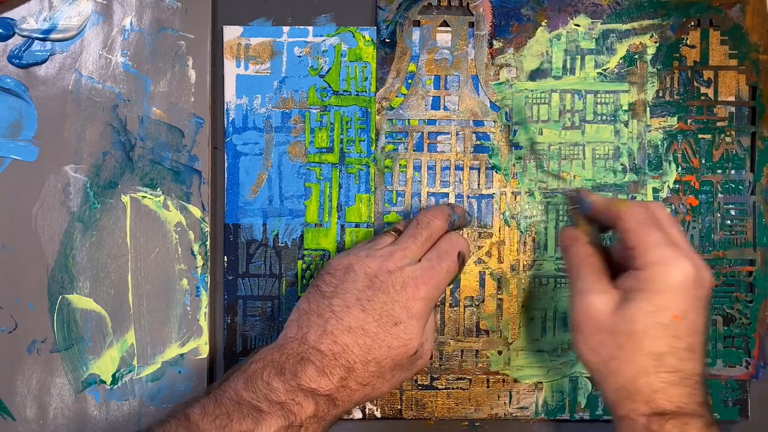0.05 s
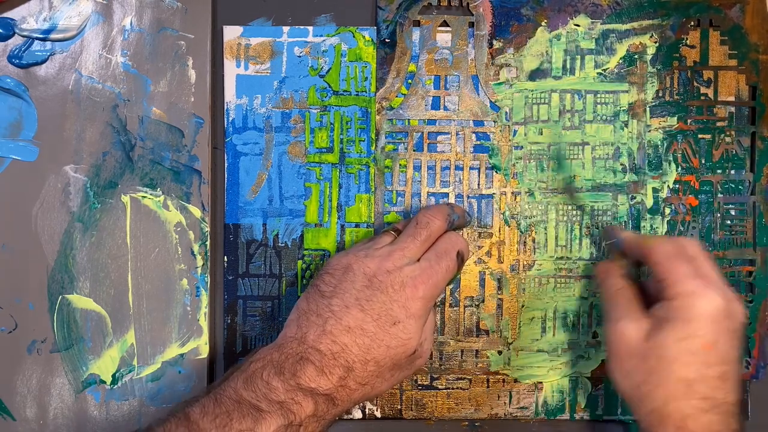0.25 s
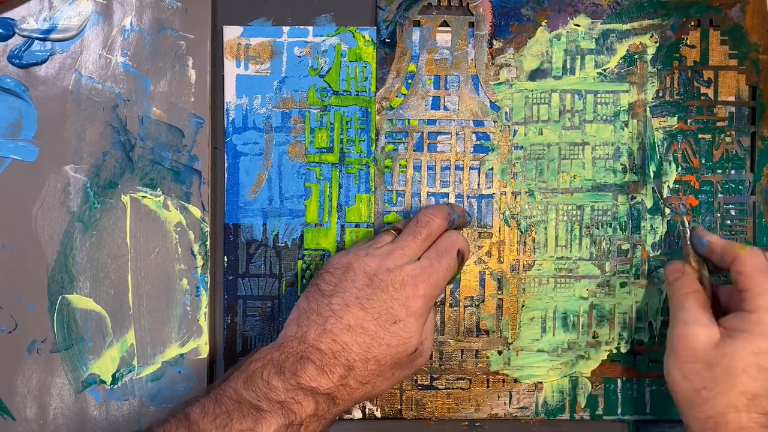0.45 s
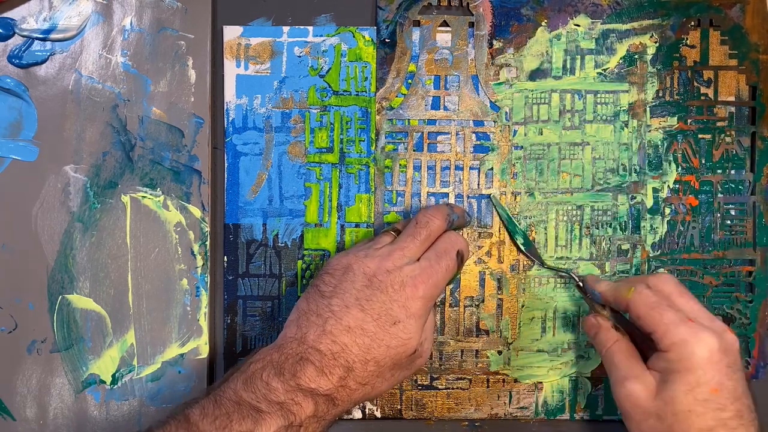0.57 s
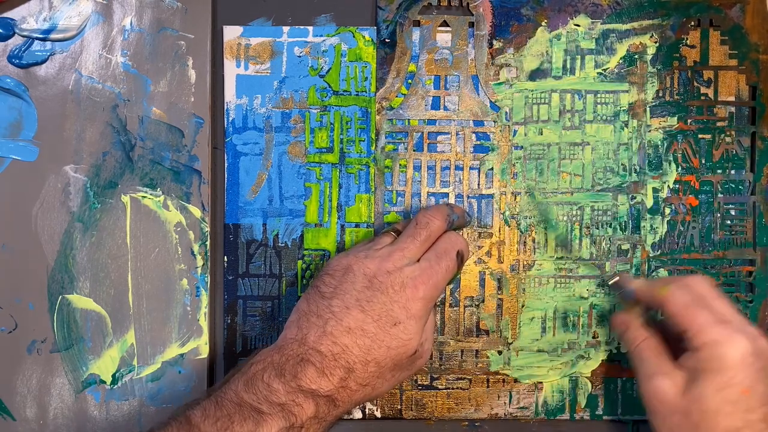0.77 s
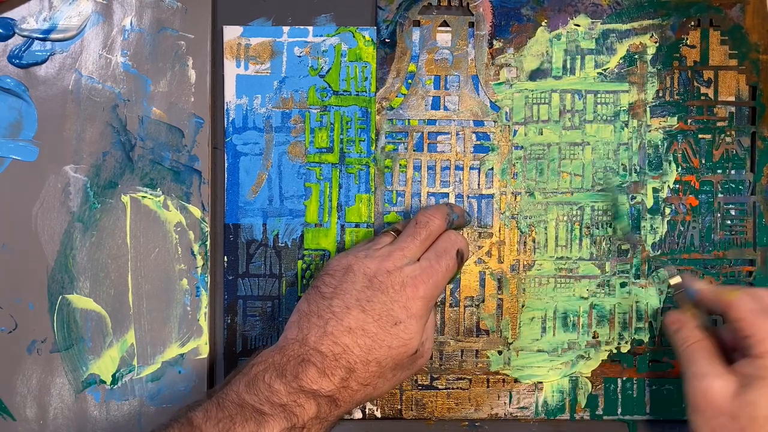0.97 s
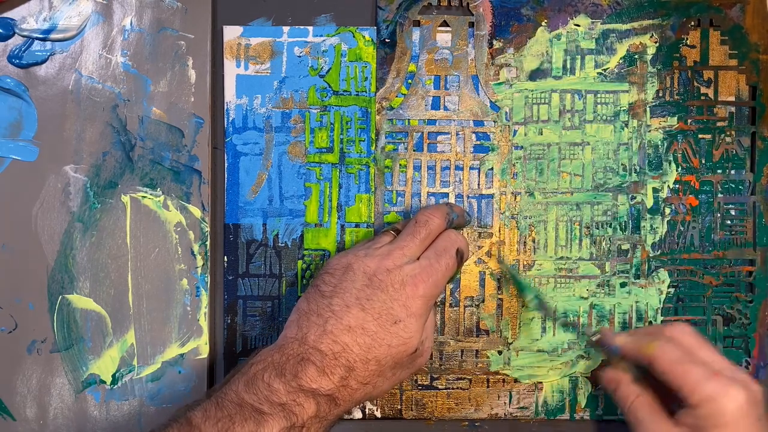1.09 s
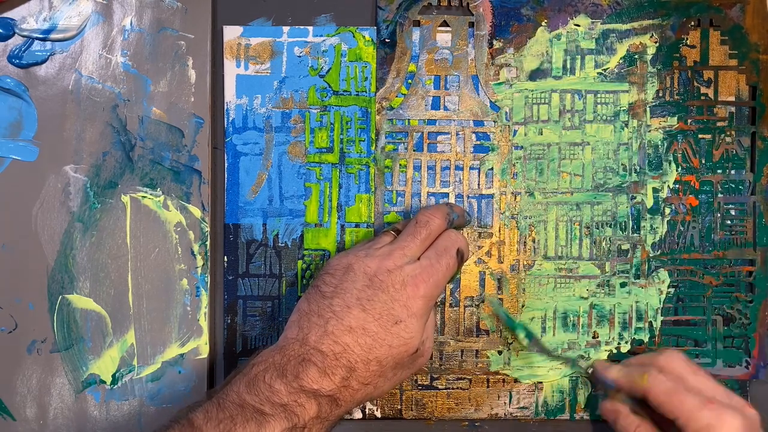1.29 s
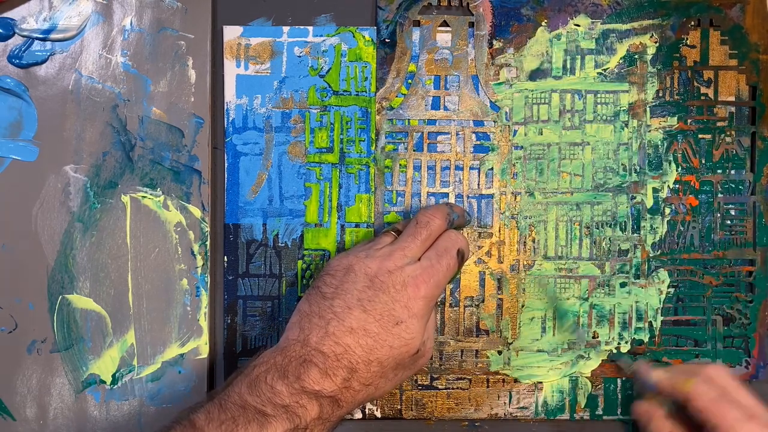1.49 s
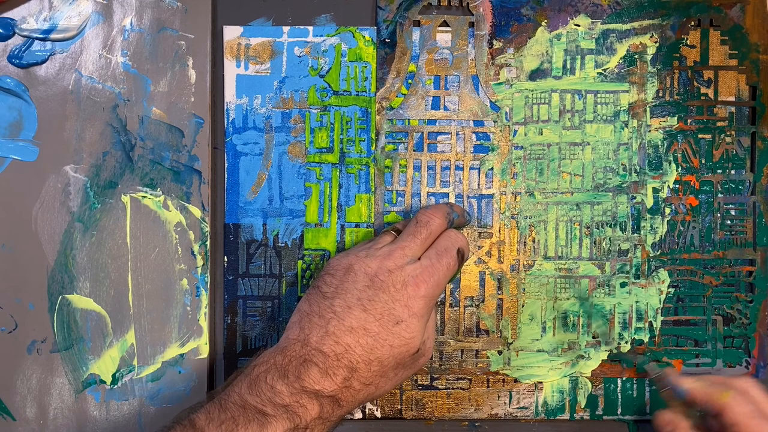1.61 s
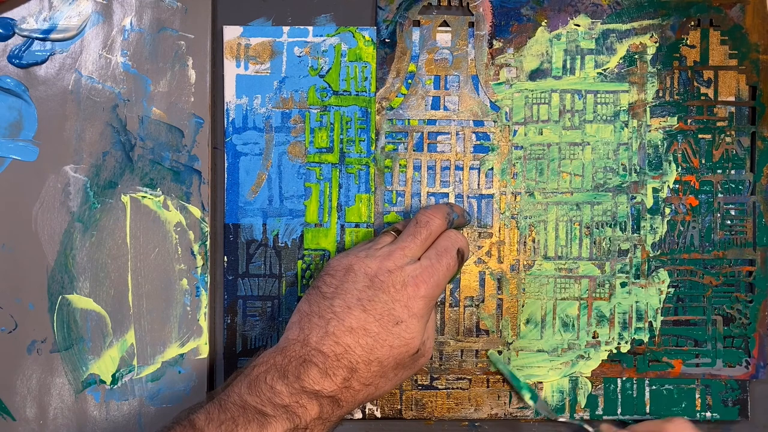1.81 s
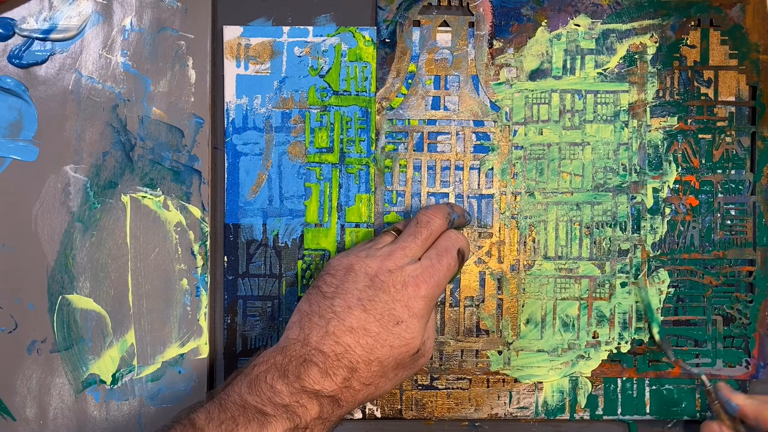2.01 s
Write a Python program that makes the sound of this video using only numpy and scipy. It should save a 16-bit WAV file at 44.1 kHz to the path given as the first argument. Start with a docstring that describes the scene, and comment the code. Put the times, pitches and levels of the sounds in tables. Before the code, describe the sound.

A thin steel palette knife scrapes a paint-gritty plastic stencil in seven short, evenly spaced strokes, each starting with a small tick; close single microphone, small quiet room, soft low buffeting between later strokes.

```python
"""Palette knife over a stencil

A thin steel palette knife is dragged in quick strokes over a plastic stencil on a board, close to one microphone.
The blade lands with a tick (decaying sines and a noise crack), then stutters over cut edges and paint grit
(random grains through blade and board spectra); snags ring briefly and the bent blade rasps in narrow noise bands.
A small room answers with decaying noise tails, over faint room tone and rumble.
Low buffeting, a swelling low noise, comes with the arm's return swings.
"""
import sys
import numpy as np
from scipy import signal
from scipy.fft import rfft, irfft, next_fast_len
from scipy.io import wavfile
from scipy.ndimage import uniform_filter1d, map_coordinates

SR = 44100
rng = np.random.default_rng(int(sys.argv[2]) if len(sys.argv) > 2 else 0)


def amplitude_ratio(level_db):
    """Convert a level in decibels to the matching linear amplitude (field) ratio."""
    exponent = np.asarray(level_db, float) / 20
    return 10 ** exponent


def inscribe(sig):
    """Save sig as 16-bit PCM at rate SR to the path in sys.argv[1].

    A 1-D sig is mono; a 2-D sig holds one channel per row.
    Samples are clipped to [-1, 1] before scaling.
    """
    pcm = np.round(np.clip(np.atleast_2d(sig).T, -1, 1) * 32767)
    wavfile.write(sys.argv[1], SR, pcm.astype(np.int16))


N = 90404  # samples

# Scrape, one table a stroke: t/s, level/dB, board thrum over it level/dB, blade-middle over it level/dB
STROKES = [
    [(0.2, -68.5, 6, 6), (0.224, -42.5, -4.5, 3.5), (0.262, -26.5, -6.5, -9.5), (0.286, -30, -14.5, -6),
     (0.31, -43, -1, 6.5), (0.324, -35, -13.5, -4.5), (0.35, -61, 9, 7)],
    [(0.483, -64, 16, 16), (0.491, -52, 5, 8), (0.501, -38, -0.5, -0.5), (0.513, -27, -8, -0.5),
     (0.547, -25, -10, -8.5), (0.571, -42.5, 1.5, 5), (0.59, -58, 10, 0)],
    [(0.728, -38.5, -9, -13), (0.74, -44.5, 0.5, 2), (0.748, -28, -8, -1), (0.758, -26, -8.5, -5.5),
     (0.79, -28, -12.5, -6), (0.796, -32, 4.5, 1.5), (0.81, -31, -3.5, 1.5), (0.85, -64, 4, 5)],
    [(0.98, -39, -9, 1.5), (0.998, -25.5, -15.5, -4), (1.044, -27, -8.5, -10), (1.062, -38, -6.5, 5.5),
     (1.09, -73, -12, 3)],
    [(1.205, -39, -2, 5), (1.211, -50.5, 5.5, 10), (1.231, -28, -12, -3), (1.257, -24.5, -14, -13.5),
     (1.269, -28.5, -7, -6.5), (1.287, -26.5, -12, -14), (1.295, -33, -11, -0.5), (1.33, -57.5, -9, 7.5)],
    [(1.45, -53, 7, 4), (1.462, -35.5, -8.5, -4), (1.484, -22.5, -15.5, -6), (1.513, -31, -6, -4.5),
     (1.528, -26.5, -12.5, -2), (1.554, -54, 6, 14.5), (1.57, -58, 4, 10)],
    [(1.695, -47.5, 8, 6.5), (1.713, -33, -13.5, -9.5), (1.743, -30.5, -3, -4), (1.763, -35.5, -5, 3.5),
     (1.781, -33, -11.5, 1), (1.82, -57, -8, 1)],
    [(2.006, -75, 14, 26.5), (2.016, -78, 9, 20.5), (2.03, -56, 2, -2.5), (2.05, -49.5, 7, 9.5)],
]
# Tail of an earlier stroke, same columns
FADING_STROKE = [(0, -44, -2, 1), (.03, -56, 0, 2), (.09, -70, 2, 3)]
# Colours of blade edge, blade middle and board: f/Hz, level/dB
EDGE_COLOUR = [(1650, -29.5), (2800, -3), (3320, -5.5), (3620, -4), (4260, -1.5), (4900, -6.5), (5400, 0),
               (8460, -6.5), (14100, -18.5), (15600, -23), (16300, -55)]
MIDDLE_COLOUR = [(680, -31), (1150, -23), (1300, -5), (1900, 1.5), (2050, -2), (3000, -5.5), (3900, -12),
                 (6600, -120)]
BOARD_COLOUR = [(71, -63), (120, -11.5), (318, -17.5), (360, -8.5), (524, 2), (629, -1), (763, 1),
                (1030, -2), (1110, -7), (1200, -4), (1560, -46), (2640, -120)]
# Longest board modes: f/Hz, level/dB, t60/s
BOARD_MODES = [(165, -20, .12), (285, -11, .14), (376, -2, .22), (840, -5, .12), (1312, -7, .1),
               (1478, -8, .08), (1542, -7, .09), (2350, -5, .12)]
# Room tone and building rumble colours: f/Hz, level/dB
AIR_COLOUR = [(80, -40), (130, -4), (400, -2), (900, -2), (1200, -10), (5900, -15), (15000, -24),
              (16000, -34)]
RUMBLE_COLOUR = [(15, -30), (30, -4), (55, 0), (72, -4), (85, -30), (150, -60)]
# Room decay: f/Hz, t60/s
ROOM_DECAY = [(200, 0.82), (530, 0.27), (1400, 0.29), (3000, 0.28), (6000, 0.23), (12000, .18)]
# The bent blade rasps at one pitch for a moment: middle t/s, length t/s, f/Hz, level/dB
RASPS = [(0.263, 0.049, 5500, -35), (0.549, 0.012, 5330, -39), (0.767, 0.035, 1320, -38.5),
         (1.034, 0.036, 5900, -31.5), (1.253, 0.022, 4200, -31), (1.283, 0.016, 6000, -34.5),
         (1.483, 0.0088, 3236, -20.5), (1.502, 0.0093, 5400, -29), (1.714, 0.012, 5560, -30),
         (1.721, 0.011, 6330, -32), (1.768, 0.025, 1880, -30.5), (1.788, 0.02, 1484, -37),
         (1.526, 0.011, 2000, -30.5), (1.744, .025, 2690, -35.5), (1.715, 0.017, 1637, -37.5),
         (0.74, 0.015, 5670, -39), (0.786, 0.031, 5930, -29.5), (1.292, 0.017, 2110, -34.5)]
# Blade snags on a stencil edge: t/s, level/dB, ring f/Hz
SNAGS = [(0.244, -22, 786), (0.259, -24, 785), (0.272, -18, 747), (0.5102, -12, 2050), (0.515, -16, 780),
         (0.525, -17.5, 835), (0.563, -25, 784), (0.796, -26, 800), (1.744, -23, 790)]
# Blade lands: t/s, level/dB, ring f/Hz, upper ring and crack over it level/dB, upper pitch f/Hz
LANDINGS = [(0.483, -29.5, 1510, -5, 5950), (0.7281, -29, 1480, 11.5, 5680), (0.98, -28, 2400, 4, 6100),
            (1.204, -22, 2256, 2.5, 6130), (1.449, -33, 2210, -2, 6000), (1.693, -30, 1590, -2, 6100),
            (2.008, -43, 1500, -17, 6100)]
# Partials of the upper blade ring: ratio to the upper pitch, level/dB, t60/s
BLADE_PARTIALS = [(1.01, 3.5, 0.0056), (0.67, -10, 0.0058), (1.4, -12, 0.01)]
# Low buffeting while the arm swings back near the microphone, one table a swing: t/s, level/dB
SWINGS = [
    [(0.66, -85), (0.678, -66), (0.694, -66), (0.71, -72)],
    [(1.07, -61), (1.106, -41.5), (1.198, -51.5), (1.212, -45.5), (1.29, -55), (1.3, -64)],
    [(1.4, -63), (1.44, -41), (1.48, -49.5)],
    [(1.6, -59), (1.644, -54.5), (1.684, -40.5), (1.714, -41.5), (1.74, -59)],
    [(1.85, -67), (1.908, -48.5), (1.956, -47.5), (1.988, -44), (2.018, -48), (2.05, -50)],
]
# Buffeting colour: f/Hz, level/dB
BUFFET_COLOUR = [(12, -2.5), (22, 5.5), (50, 0), (100, -11.5), (160, -21), (300, -64)]

SLIPS_PER_S = 14000  # mean grain rate
MODES_DB, ROOM_DB = -12, -12
AIR_DB, RUMBLE_DB = -66, -70  # rms levels
RASP_WIDTH = 0.041  # share of the pitch over which a rasp falls 9 dB
LAND_T60_S, SNAG_T60_CYCLES, CONTACT_S = 0.023, 13.4, 0.0007
CRACK_DB, CRACK_HZ = -11, 9000  # the landing crack is dull above CRACK_HZ
LOW_CUT_HZ = 145  # low cut that keeps scrapes, rasps and knocks free of low thump
TOP_HZ = 15900  # the microphone chain cuts steeply above this


def unit(x):
    """Scales a signal to rms 1."""
    return x / np.sqrt(np.mean(x ** 2) + 1e-20)


def along(points, hz):
    """Reads (Hz, value) points on a log frequency axis."""
    f, v = np.transpose(points)
    return np.interp(np.log(hz + 1), np.log(f + 1), v)


def wobble(rate):
    """Draws a smooth random curve with rate knots a second."""
    knots = rng.standard_normal(int(N * rate / SR) + 4)
    return map_coordinates(knots, [np.arange(N) * rate / SR])


def coloured(x, points):
    """Shapes x with a spectrum and brings it to rms 1."""
    size = next_fast_len(N + 8192)
    gain = amplitude_ratio(along(points, np.fft.rfftfreq(size, 1 / SR)))
    return unit(irfft(rfft(x, size) * gain, size)[:N])


def gains(tables):
    """Turns each dB column into a gain per sample, silent outside the tables."""
    t, total = np.arange(N) / SR, 0
    for rows in tables:
        s, *columns = np.transpose(rows)
        total = total + amplitude_ratio([np.interp(t, s, c, left=-200, right=-200) for c in columns])
    return total


def slips(spread_db, patchy_db, judder_db):
    """Dense stick-slip grains of uneven size, whose resonances shift as the blade bends."""
    struck = rng.random(N) < SLIPS_PER_S / SR
    grains = struck * rng.standard_normal(N) * amplitude_ratio(spread_db * rng.standard_normal(N))
    spectrum = signal.stft(grains, nperseg=256)[2]
    # random boosts and dips, smoothed over 3 bins and 5 frames
    patches = uniform_filter1d(rng.standard_normal(spectrum.shape), 3, 0)
    patches = unit(uniform_filter1d(patches, 5, 1))
    patchy = signal.istft(spectrum * amplitude_ratio(patchy_db * patches), nperseg=256)[1][:N]
    return patchy * amplitude_ratio(judder_db * wobble(150))


def scrape():
    """Each stroke excites blade edge, blade middle, board and the board's long modes."""
    level, board_gain, middle_gain = gains([FADING_STROKE] + STROKES)
    edge = coloured(slips(spread_db=-1.5, patchy_db=3.5, judder_db=-0.17), EDGE_COLOUR)
    middle = coloured(slips(spread_db=1.0, patchy_db=4.0, judder_db=-1.0), MIDDLE_COLOUR)
    board = coloured(slips(spread_db=2, patchy_db=3, judder_db=0), BOARD_COLOUR)
    t = np.arange(SR // 2) / SR
    modes = sum(amplitude_ratio(db - 60 * t / t60) * np.sin(2 * np.pi * hz * t) for hz, db, t60 in BOARD_MODES)
    drive = level * board_gain * rng.standard_normal(N)
    ringing = signal.fftconvolve(drive, modes / np.linalg.norm(modes))[:N]
    return level * (edge + middle_gain * middle + board_gain * board) + amplitude_ratio(MODES_DB) * ringing


def studio():
    """Faint room tone and building rumble, two steady coloured noises."""
    air = coloured(rng.standard_normal(N), AIR_COLOUR)
    rumble = coloured(rng.standard_normal(N), RUMBLE_COLOUR)
    return amplitude_ratio(AIR_DB) * air + amplitude_ratio(RUMBLE_DB) * rumble


def room(x):
    """Each frequency dies at its own speed; every quarter second gets a new random tail."""
    out, step = np.zeros(N + SR), SR // 4
    for start in range(0, N, step):
        hz, t, noise = signal.stft(rng.standard_normal(SR // 2), SR, nperseg=256)
        decay = amplitude_ratio(-60 * t / along(ROOM_DECAY, hz)[:, None])
        tail = signal.istft(noise * decay, SR, nperseg=256)[1]
        wet = signal.fftconvolve(x[start:start + step], tail / np.linalg.norm(tail))
        out[start + 200:][:len(wet)] += wet  # pre-delay of 200 samples
    return out[:N]


def rasps():
    """The bent blade's narrow rough tones, each under a bell-shaped swell."""
    t, out = np.arange(N) / SR, 0
    for s, length, hz, db in RASPS:
        band = [(hz * (1 + k * RASP_WIDTH), -9 * abs(k)) for k in range(-5, 6)]
        swell = np.exp(-(2 * (t - s) / length) ** 2)
        out = out + amplitude_ratio(db) * swell * coloured(rng.standard_normal(N), band)
    return out


def ring(t, hz, db, t60):
    """A mode decays exponentially, its onset softened by the contact time."""
    onset = 1 - np.exp(-t / CONTACT_S)
    return amplitude_ratio(db - 60 * t / t60) * np.sin(2 * np.pi * hz * t) * onset


def knocks():
    """Landings ring the blade and crack; snags knock the board into a short ring."""
    out, t = np.zeros(N + SR), np.arange(SR // 10) / SR
    dull = signal.butter(2, CRACK_HZ, fs=SR, output="sos")
    for s, db, hz, upper_db, upper_hz in LANDINGS:
        noise = signal.sosfilt(dull, rng.standard_normal(len(t)))
        crack = amplitude_ratio(CRACK_DB - 60 * t / 0.003) * noise  # t60 3 ms
        upper = sum(ring(t, ratio * upper_hz, level, t60) for ratio, level, t60 in BLADE_PARTIALS)
        tick = ring(t, hz, db, LAND_T60_S) + amplitude_ratio(db + upper_db) * (upper + crack)
        out[round(s * SR):][:len(t)] += tick
    for s, db, hz in SNAGS:
        out[round(s * SR):][:len(t)] += ring(t, hz, db, SNAG_T60_CYCLES / hz)
    return out[:N]


def arm():
    """Slow lumps of moving air, softly switched on and off."""
    swing = uniform_filter1d(gains(SWINGS)[0], size=600)
    return swing * coloured(rng.standard_normal(N), BUFFET_COLOUR)


def scene():
    """One microphone feeds both channels with knife, room and moving air."""
    low_cut = signal.butter(3, LOW_CUT_HZ, "high", fs=SR, output="sos")
    knife = signal.sosfilt(low_cut, scrape() + rasps() + knocks())
    mono = knife + amplitude_ratio(ROOM_DB) * room(knife) + studio() + arm()
    return np.tile(mono, (2, 1))


def roll_off(x):
    """The treble ends steeply here."""
    return signal.sosfilt(signal.butter(12, 16500, fs=SR, output="sos"), x)


def record(dry):
    """The microphone chain limits the band with a steep elliptic low-pass."""
    steep = signal.ellip(10, 0.2, 70, TOP_HZ, fs=SR, output="sos")
    mix = signal.sosfilt(steep, dry)
    return roll_off(mix)


dry = scene()
out = record(dry)
inscribe(out)
```